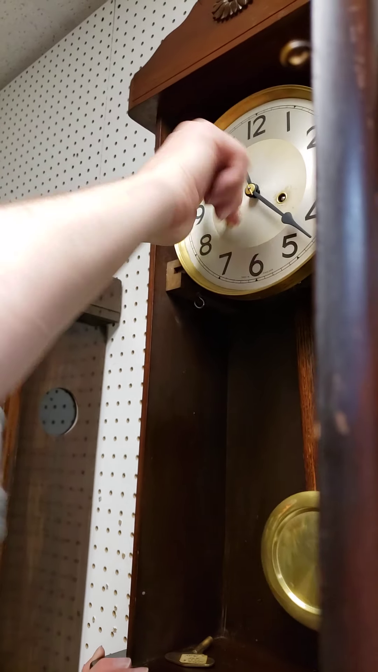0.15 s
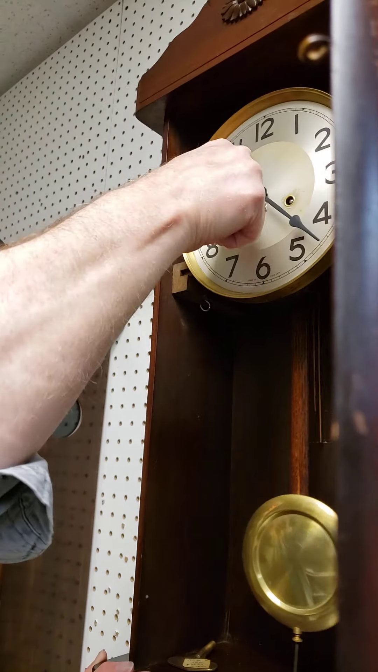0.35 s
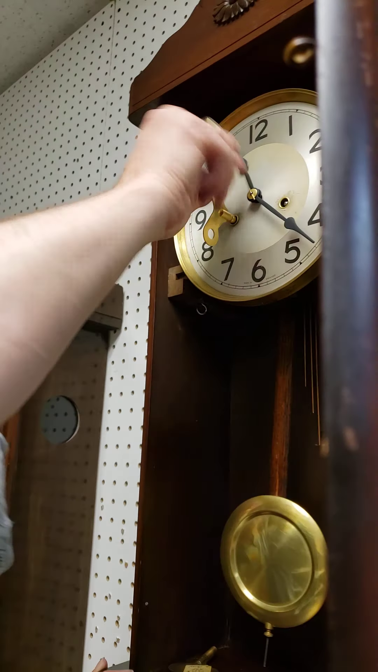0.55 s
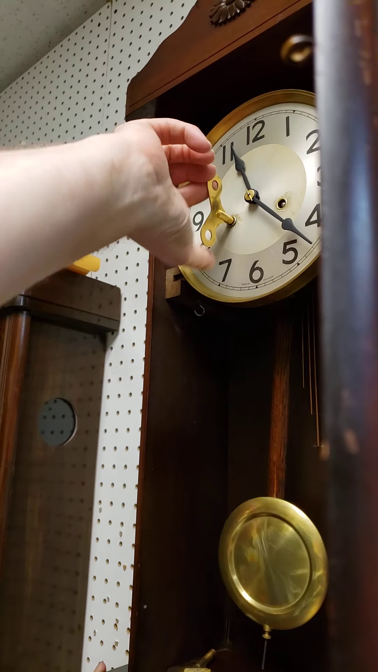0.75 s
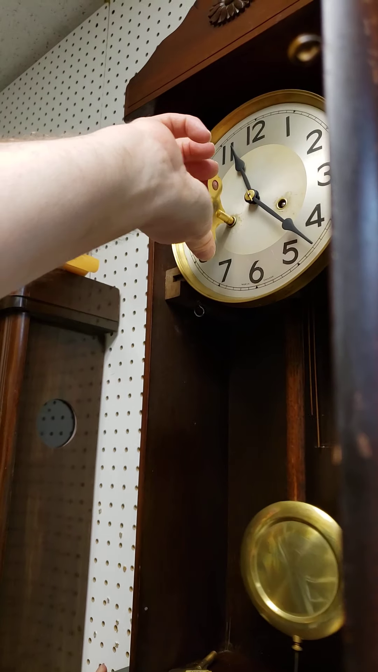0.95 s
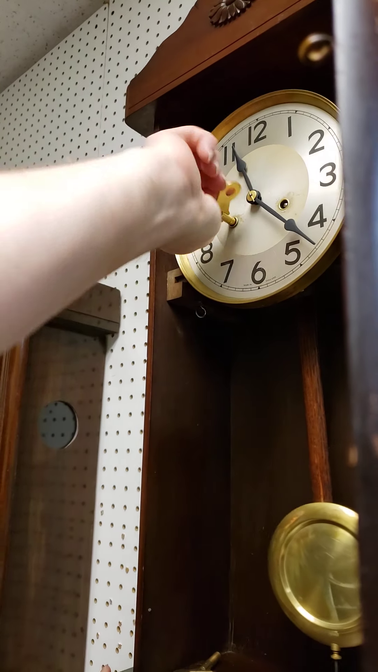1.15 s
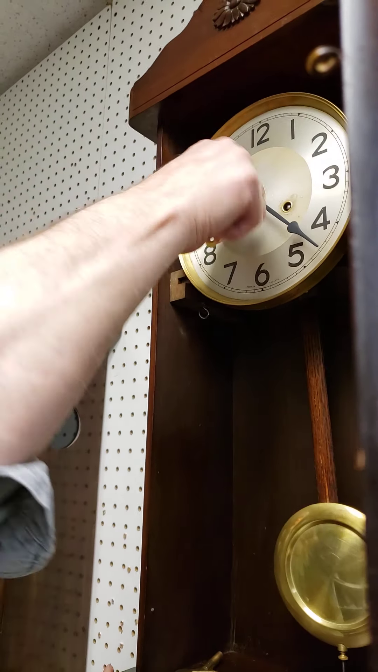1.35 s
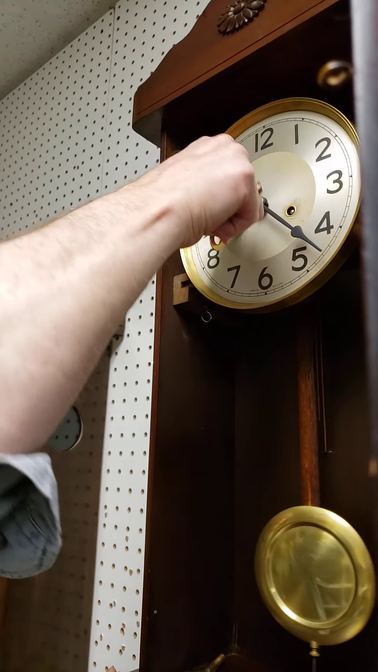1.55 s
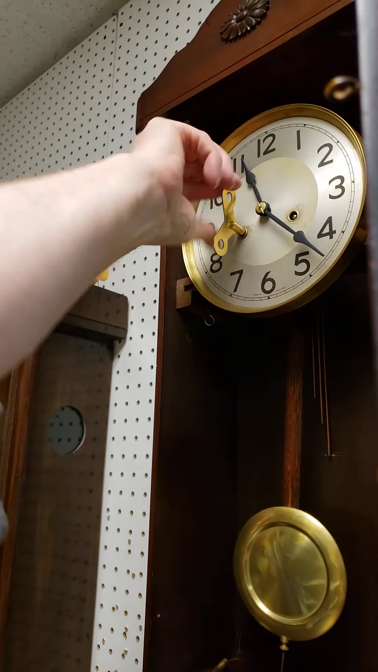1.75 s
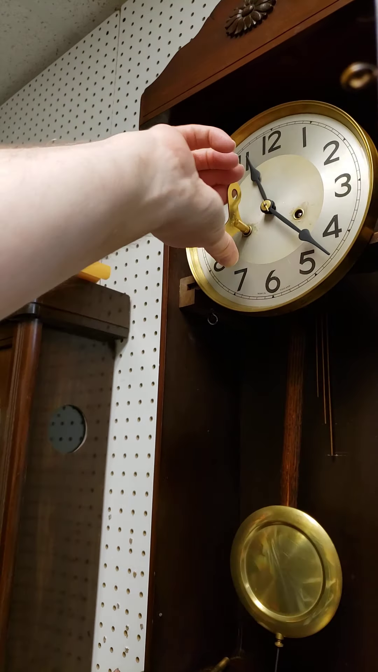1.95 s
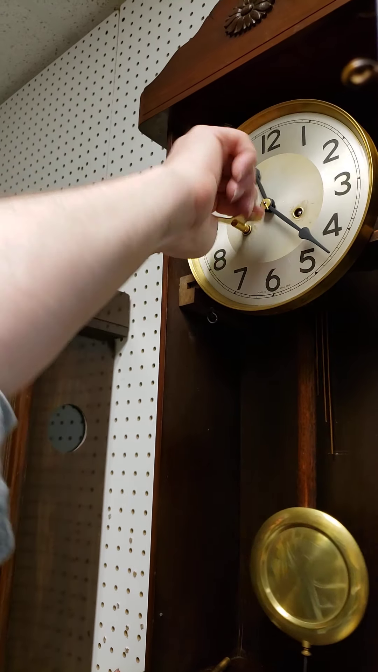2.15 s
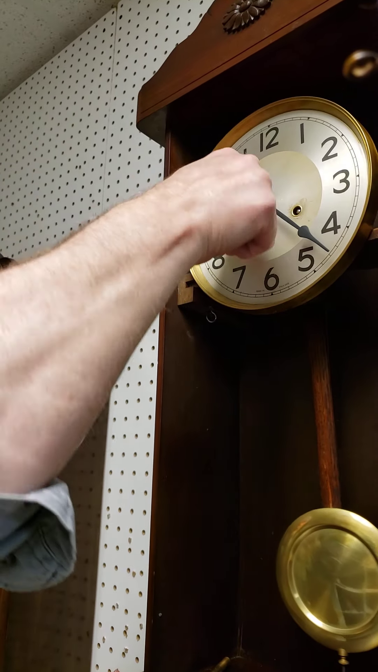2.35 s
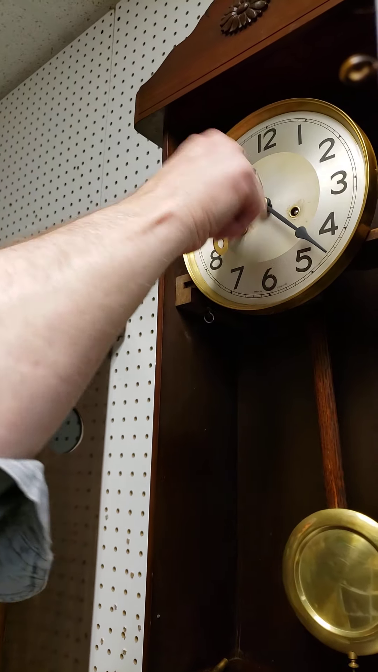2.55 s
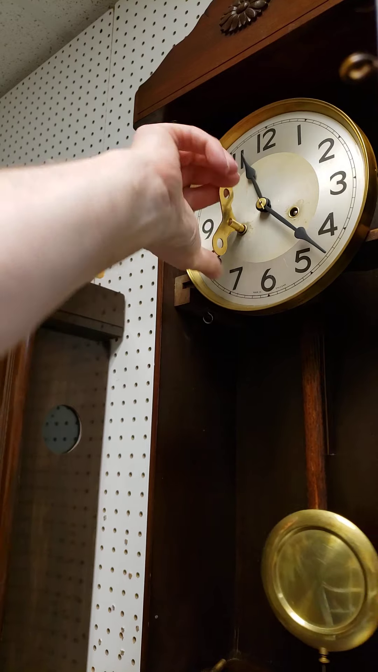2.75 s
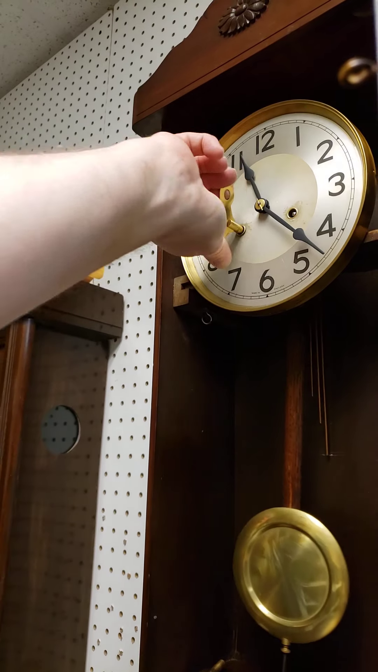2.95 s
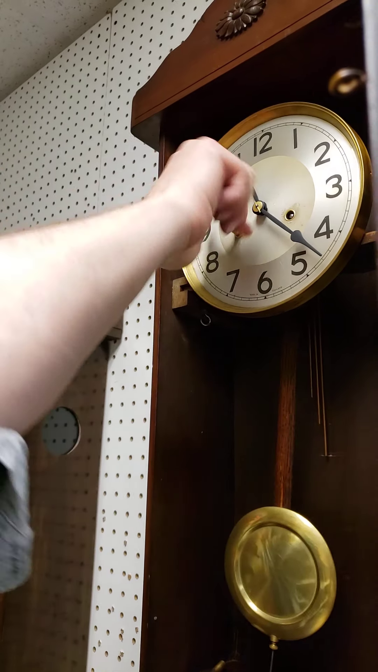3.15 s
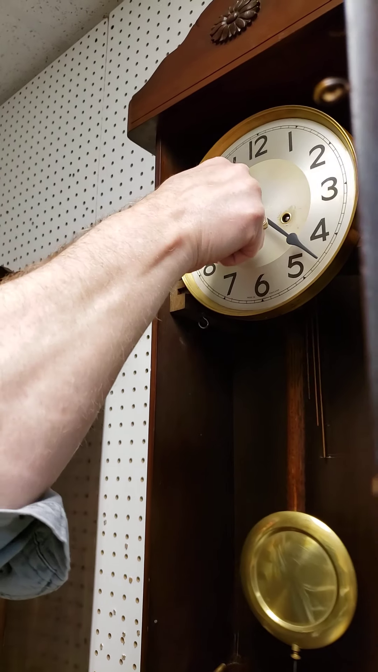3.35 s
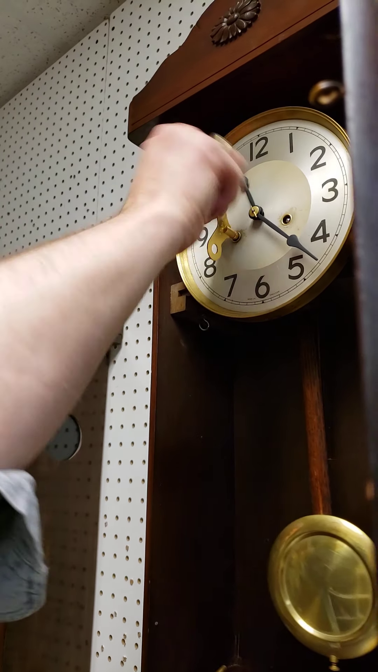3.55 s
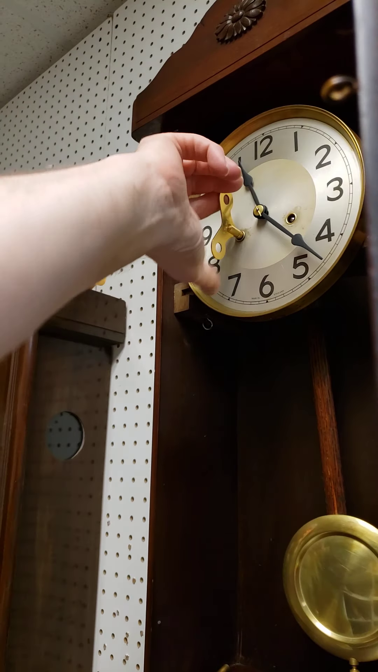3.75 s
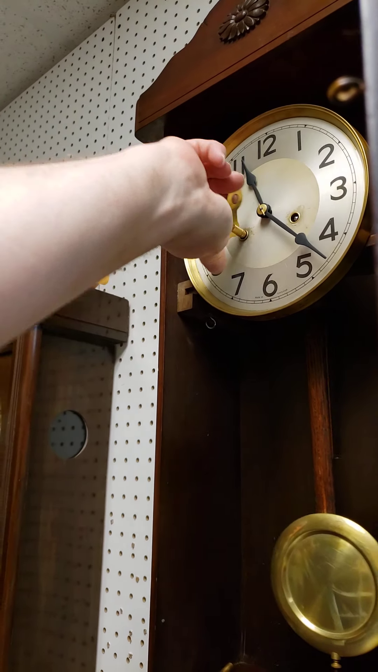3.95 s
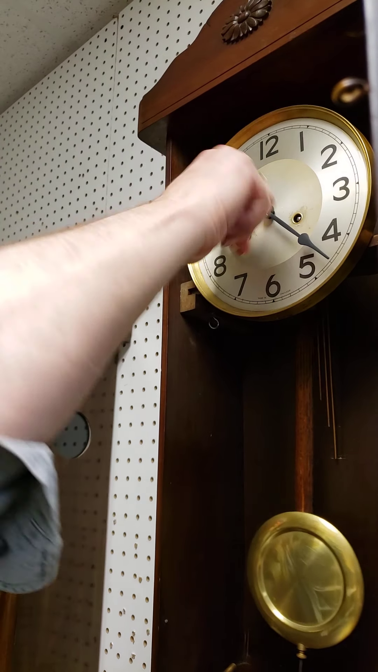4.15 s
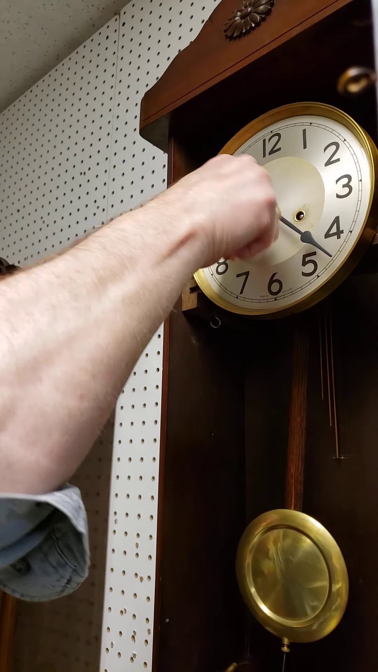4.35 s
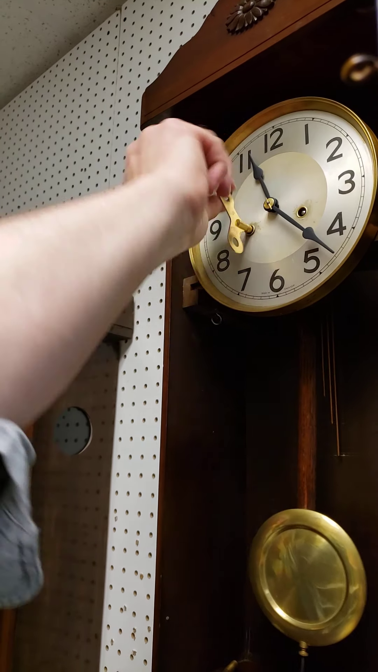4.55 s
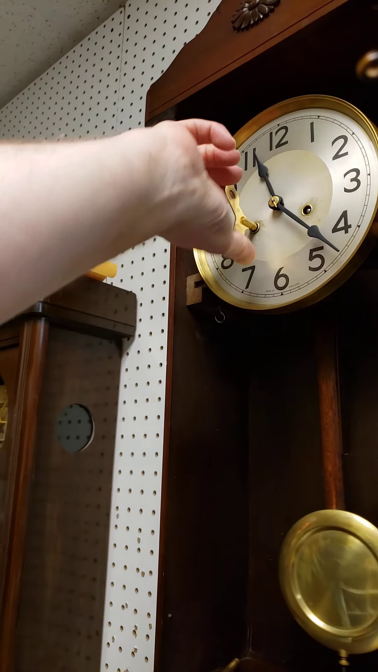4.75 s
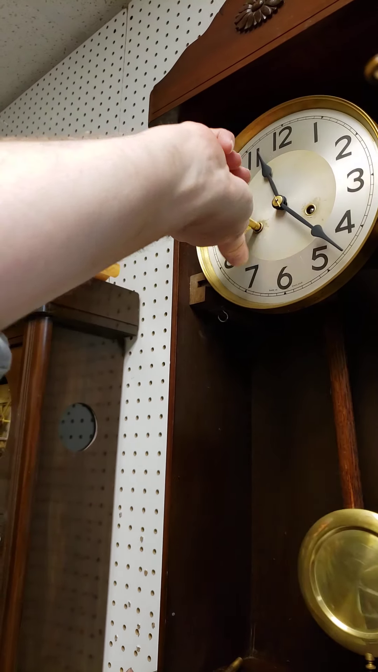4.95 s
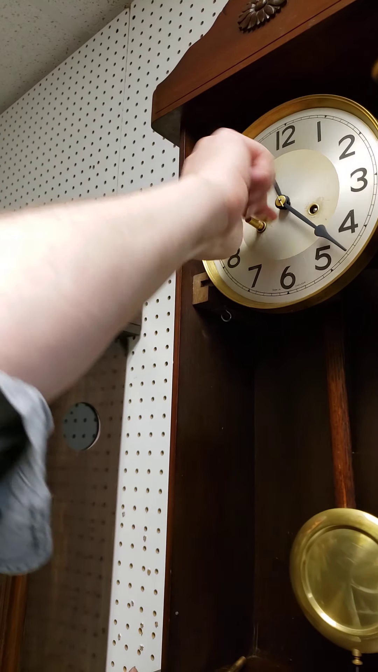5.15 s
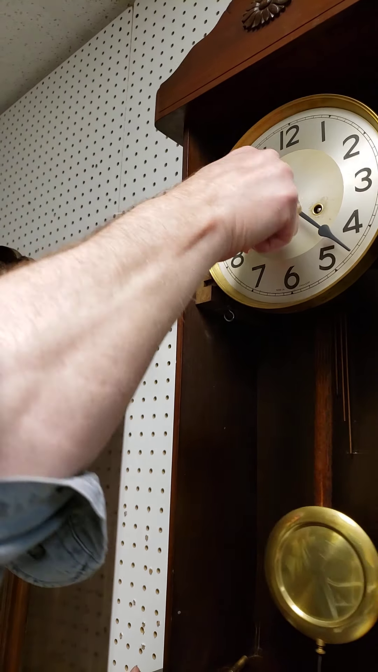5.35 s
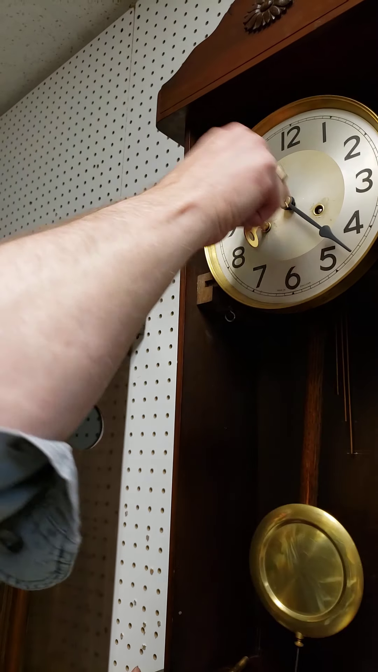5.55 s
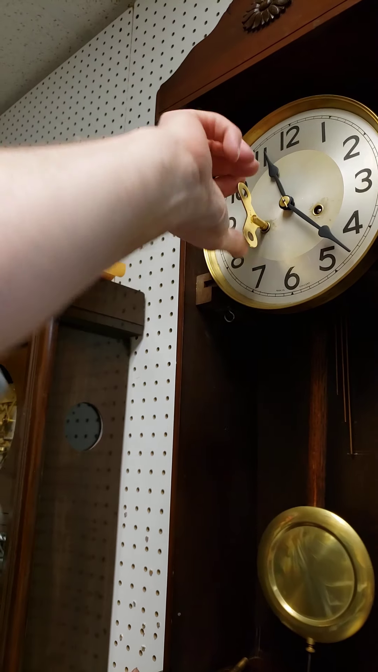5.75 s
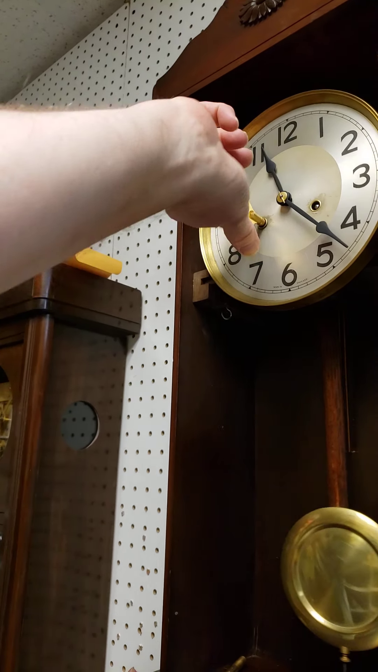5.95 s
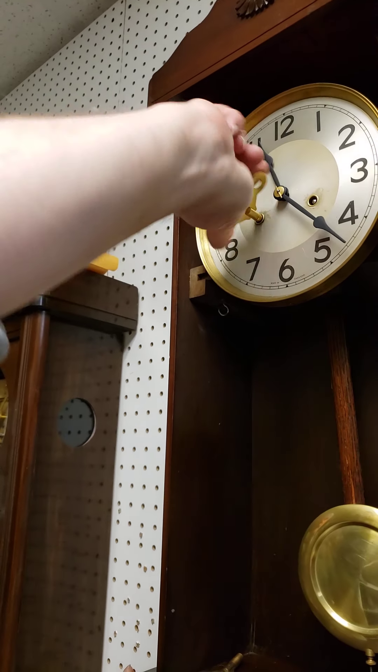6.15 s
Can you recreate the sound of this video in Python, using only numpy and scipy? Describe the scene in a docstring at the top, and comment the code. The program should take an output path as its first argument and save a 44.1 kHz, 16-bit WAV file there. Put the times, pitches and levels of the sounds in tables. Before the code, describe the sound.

After a moment of faint room air, arm rumble and a light hand knock, a clock key starts turning. The pawl snaps rapidly over metal teeth, pauses with a dull thud of the wooden case, and the hand fumbles softly for a new grip. This repeats six times at a steady pace, the last two thuds heaviest. Near, dry stereo sound with a slight ceiling echo, ending on quiet handling.

```python
"""Quiet room air and the rumble and rub of a moving arm come first, then a soft knock of a hand on a key.
Six half turns of the brass key wind a wooden wall clock: the pawl snaps over eight or nine ratchet teeth
in each, ringing damped modes and a dense noise of the brass plates. Between turns the wheel settles back
on the pawl and the hand lets go and grips again: thuds of the wooden case, brass ticks and cloth swishes.
Noise filtered by spectrum makes air, arm and rub; a ceiling echo and a short tail make the workshop."""
import sys
import numpy as np
from scipy import signal
from scipy.fft import rfft, irfft
from scipy.io import wavfile
from scipy.ndimage import uniform_filter1d

SR = 44100
rng = np.random.default_rng(int(sys.argv[2]) if len(sys.argv) > 2 else 0)


def store_pcm(level_fs):
    """Save levels as 16-bit WAV."""
    pcm = np.round(np.clip(level_fs, -1, 1) * 32767).astype(np.int16)
    wavfile.write(sys.argv[1], SR, np.atleast_2d(pcm).T)


N = 272979  # length in samples


def gain_of(db):
    """Logarithmic level: decibels to an amplitude factor."""
    return 10 ** (np.asarray(db) / 20)


def evened(x):
    """Power normalisation: scales to rms 1."""
    return x / np.sqrt(np.mean(x ** 2) + 1e-20)


def read(points, hz):
    """Interpolation in pitch: reads a table on a log-frequency axis."""
    f, value = np.transpose(points)
    return np.interp(np.log(hz + 1), np.log(f + 1), value)


def along(curve, at):
    """Linear interpolation: reads every column of a curve at the given places."""
    places, *columns = np.transpose(curve)
    return [np.interp(at, places, column) for column in columns]


def hump(hz, centre_hz, octaves):
    """Resonance-like weighting: a bell curve on a log-frequency axis, height 1."""
    return np.exp(-(np.log2((hz + 1) / centre_hz) / octaves) ** 2)


def add(mix, s, sound):
    """Superposition: mixes a sound in at time s."""
    part = mix[:, max(round(s * SR), 0):][:, :sound.shape[-1]]
    part += sound[..., :part.shape[1]]


def pan(left_db):
    """Level difference between the two microphones, left minus right, as two gains."""
    return gain_of(np.array([[left_db], [-left_db]]) / 2)


def colour(x, spectrum, size=2048):
    """Minimum-phase filtering: a causal response with the given spectrum."""
    log_gain = np.log(gain_of(read(spectrum, abs(np.fft.fftfreq(size, 1 / SR)))))
    taps = np.fft.ifft(np.exp(np.conj(signal.hilbert(log_gain)))).real
    return signal.oaconvolve(np.atleast_2d(x), taps[None], axes=1)[:, :x.shape[-1]]


# likeness of the sound at the two microphones: frequency_hz, likeness (0 to 1)
ALIKENESS = [(100, 0.94), (300, 0.93), (700, 0.46), (1500, 0.7), (3000, 0.08), (16000, 0.067)]


def noise(size):
    """Partial coherence: white stereo noise whose bass is nearly the same at both microphones."""
    a, b = rfft(rng.standard_normal((2, size)))
    alike = read(ALIKENESS, np.fft.rfftfreq(size, 1 / SR))
    return irfft(np.array([a, alike * a + np.sqrt(1 - alike ** 2) * b]), size)


def ring(rise, fall, size=2048):
    """High modal density: countless close modes swell and die after one blow; energy 1."""
    t = np.arange(size) / SR
    envelope = (1 - np.exp(-t / rise)) * np.exp(-t / fall)
    return evened(noise(size) * envelope) / np.sqrt(size)


def levelled(x, count=9):
    """Spectral smoothing: no band of a dense ring stands out; energy about 1."""
    z = rfft(x)
    z = z / np.sqrt(uniform_filter1d(abs(z) ** 2, size=count, axis=1) + 1e-12)
    return irfft(z)


def mode(hz, db, t60, t):
    """Damped oscillation: one exponentially dying sine."""
    return gain_of(db - 60 * t / t60) * np.sin(2 * np.pi * hz * t)


def chatter(depth_db, grain, size):
    """Uneven contact: a random gain of rms 1, smoothed over grain samples."""
    wander = evened(uniform_filter1d(rng.standard_normal(size), grain))
    return evened(gain_of(depth_db * wander))


def swell(t, rise, fall):
    """Transient envelope: a smooth rise and an exponential fall, height 1."""
    shape = (1 - np.exp(-t / rise)) * np.exp(-t / fall)
    return shape / shape.max()


# spectrum of the still room: frequency_hz, density_db (dB per Hz, relative)
AIR_SPECTRUM = [(25, -1), (65, 1), (200, -4), (500, -13.5), (1100, -19), (2000, -30), (7000, -42),
                (9000, -47.5), (15000, -28.5), (16500, -43.5)]
AIR_DB = -72.5


def still_air():
    """Stationary random noise: the still room as one steady coloured hiss."""
    return gain_of(AIR_DB) * evened(colour(noise(N), AIR_SPECTRUM))


# the wheel settling back on the pawl after each turn: start_s, thud_db, brass_tick_db, arm_sweep_db
# (levels relative)
SETTLINGS = [(0.482, -31, -49, -2.5), (1.594, -32.5, -53, 0), (2.535, -32.5, -44.5, 0),
             (3.48, -33, -51, 1.5), (4.455, -26.5, -41.5, 1.5), (5.541, -25, -34, 0)]
# the arm's sweep, alike in every turn: from_settle_s, rumble_db, hiss_db (before arm_sweep_db)
ARM_SWEEP = [(-0.5, -71.5, -88.5), (-0.38, -61.5, -80.5), (-0.22, -57.5, -74.5), (-0.07, -64, -76.5),
             (0.05, -61, -72.5), (0.17, -58, -72.5), (0.3, -58, -81.5), (0.42, -69.5, -82), (0.6, -75, -86)]
REST_DB_PER_S = 35  # the arm's sound dying away between sweeps


def sweeps():
    """Level contour: the arm's rumble and hiss (dB) around every settle, fading to rest outside it."""
    t = np.arange(N) / SR
    start, end = ARM_SWEEP[0][0], ARM_SWEEP[-1][0]
    levels = []
    for s, *_, arm_db in SETTLINGS:
        since = t - s
        outside = abs(since - np.clip(since, start, end))
        levels.append(np.array(along(ARM_SWEEP, since)) + arm_db - REST_DB_PER_S * outside)
    return np.max(levels, axis=0)


# spectrum of the arm's low rumble: frequency_hz, density_db (dB per Hz, relative)
RUMBLE_SPECTRUM = [(25, -11.5), (63, 7.5), (90, 3), (240, 0), (400, -2), (700, -16.5), (1200, -27),
                   (4000, -55)]
# spectrum of rubbing skin and cloth: frequency_hz, density_db (dB per Hz, relative)
RUB_SPECTRUM = [(500, -5.5), (1500, 0), (4000, -4.5), (6800, 2.5), (8800, -13), (12000, -2.5), (15000, 4),
                (16200, -19)]


def arm(grain_db=4):
    """Friction noise of the moving arm: an uneven low rumble and a fine, grainy rub of skin and cloth."""
    rumble_db, hiss_db = sweeps()
    grain = chatter(grain_db, 900, N)
    rumble = gain_of(rumble_db) * evened(grain * colour(noise(N), RUMBLE_SPECTRUM))
    hiss = gain_of(hiss_db) * evened(grain * colour(noise(N), RUB_SPECTRUM))
    return pan(1.6) * rumble + pan(4) * hiss


# the hand gripping the key or letting it go: start_s, thud_db, thud_centre_hz, brass_tick_db
# (levels relative)
HAND_TOUCHES = [(0.061, -39.5, 292, -71), (0.707, -37.5, 254, -52), (0.749, -38, 315, -54),
                (1.134, -50.5, 169, -71), (1.158, -39.5, 253, -86), (1.685, -42.5, 378, -49.5),
                (1.795, -33.5, 245, -56), (1.829, -42.5, 220, -76.5), (2.096, -41, 610, -64.5),
                (2.775, -44, 266, -76), (2.989, -56, 311, -65), (3.053, -37.5, 240, -88),
                (3.591, -50.5, 193, -56), (3.697, -46, 253, -71.5), (4.026, -40.5, 150, -67),
                (4.64, -41.5, 270, -47.5), (4.677, -30, 430, -46), (4.823, -48, 378, -56),
                (5.021, -36, 247, -63), (5.791, -43, 277, -85), (5.85, -45.5, 249, -55.5),
                (6.058, -67, 620, -57), (6.148, -39.5, 816, -71.5)]
# a settle's light first touch, blow and two rebounds: from_blow_s, thud_db, thud_centre_hz, brass_tick_db
# (levels added to those of the settle)
SETTLE_IMPACTS = [(-0.024, -12, 475, -15), (0, -3, 398, 2), (0.012, -1.5, 250, -6.5),
                  (0.042, -14, 170, -6.5)]
# stray brushes of the fingers after each settle; levels relative, before the fade
BRUSH_FROM_S, BRUSH_TO_S, BRUSH_FADE_DB_PER_S = 0.044, 0.29, 21.5
BRUSH_DB, BRUSH_HZ, BRUSH_TICK_DB = -48.5, 282, -66


def bumps(count=3):
    """Impact sequence (s, thud dB, centre Hz, tick dB): touches, settles with rebounds, finger brushes."""
    yield from HAND_TOUCHES
    for s, thud_db, tick_db, _ in SETTLINGS:
        for delay, extra_db, centre_hz, extra_tick_db in SETTLE_IMPACTS:
            yield s + delay, thud_db + extra_db, centre_hz, tick_db + extra_tick_db
        shares = (np.arange(count) + rng.random(count)) / count
        for delay in BRUSH_FROM_S + (BRUSH_TO_S - BRUSH_FROM_S) * shares:
            fade_db = BRUSH_FADE_DB_PER_S * delay
            yield s + delay, BRUSH_DB - fade_db, BRUSH_HZ, BRUSH_TICK_DB - fade_db


# modes of the wooden case: pitch_hz, level_db (relative), t60_s
WOOD_MODES = [(64.5, -8.5, 0.34), (118, -8, 0.14), (170, -10, .12), (197, -6, 0.2), (248, -3, .1),
              (290, -9, .08), (367, -12, 0.1), (510, -5.5, 0.044), (582.4, -1, 0.11), (660, -5.5, .07),
              (760, -5, 0.06), (1160, -16, 0.1)]
# dense ring of the wood: frequency_hz, density_db (dB per Hz, relative)
WOOD_SPECTRUM = [(40, -27), (120, -3), (250, -3.5), (650, -5.5), (900, -10.5), (1300, -23.5), (3000, -25),
                 (9000, -59)]
# dense ring of the key in its hole: frequency_hz, density_db (dB per Hz, relative)
KEY_SPECTRUM = [(300, -15.5), (1000, -5), (2800, 0.5), (4000, -3.5), (6500, -3), (9000, -10), (12000, -8.5),
                (15000, 0.5), (16500, -18.5)]
CASE_SIDE_DB = 1.8  # left minus right


def knocks(modes_db=-21, wood_db=31, tick_db=25, spread_db=5.5, focus_db=10, octaves=0.63, size=4096):
    """Modal excitation: each bump favours case modes near its centre pitch; the key rattles in its hole."""
    tones, wood, ticks = np.zeros((3, 2, N))
    t, hz = np.arange(SR // 2) / SR, np.fft.rfftfreq(size, 1 / SR)
    for s, thud_db, centre_hz, brass_db in bumps():
        sizes_db = thud_db + modes_db + spread_db * rng.standard_normal(len(WOOD_MODES))
        for (f, db, t60), size_db in zip(WOOD_MODES, sizes_db):
            ringing = mode(f, db + size_db + focus_db * hump(f, centre_hz, octaves), t60, t)
            add(tones, s + 0.0014, rng.choice([-1, 1]) * ringing)
        blow = rfft(levelled(ring(rise=0.0028, fall=0.019, size=size), count=21))
        focus = gain_of(focus_db * hump(hz, centre_hz, octaves))
        add(wood, s, gain_of(thud_db + wood_db) * irfft(blow * focus))
        rattle = chatter(depth_db=11, grain=270, size=size)
        add(ticks, s, gain_of(brass_db + tick_db) * rattle * ring(rise=.002, fall=.008, size=size))
    return pan(CASE_SIDE_DB) * (tones + colour(wood, WOOD_SPECTRUM)) + pan(1) * colour(ticks, KEY_SPECTRUM)


def fingers(rub_db=-71, follow=0.16, rise_s=0.0033, fall_s=0.026, grain_db=4):
    """Sliding friction: at each touch skin rubs briefly on the key, louder when the key ticks harder."""
    level, t = np.zeros((1, N)), np.arange(SR // 4) / SR
    usual_db = np.mean([tick_db for *_, tick_db in HAND_TOUCHES])
    for s, _, _, tick_db in HAND_TOUCHES:
        add(level, s, gain_of(rub_db + follow * (tick_db - usual_db)) * swell(t, rise_s, fall_s))
    return pan(3) * level * evened(chatter(grain_db, 130, N) * colour(noise(N), RUB_SPECTRUM))


# decay time of the room: frequency_hz, t60_s
ROOM_DECAY = [(100, 0.78), (500, 0.25), (2000, 0.26), (6000, 0.22), (15000, 0.19)]
# spectrum of the room's tail: frequency_hz, level_db (relative)
ROOM_SPECTRUM = [(100, -4), (600, 0), (1400, 0.5), (2000, -2), (2900, -0.5), (4000, 0), (7000, -2.5),
                 (15000, -2)]


def room_response(wet_db=-4, wall_db=-12, wall_s=0.012, build_s=0.0046):
    """Frequency-dependent reverberation: a scattered near-wall reflection and a tail dying by band."""
    hz, t, z = signal.stft(noise(SR // 2), SR, nperseg=256)
    decay = gain_of(-60 * t / read(ROOM_DECAY, hz)[:, None])
    tail = signal.istft(z * decay, SR, nperseg=256)[1]
    tail *= 1 - np.exp(-(np.arange(tail.shape[1]) / SR / build_s) ** 2)
    tail = gain_of(wet_db) * colour(tail / np.linalg.norm(tail[0]), ROOM_SPECTRUM)
    add(tail, wall_s, gain_of(wall_db) * ring(rise=0.012, fall=0.0014))
    return tail


# ceiling reflection: frequency_hz, level_db (relative to the direct sound)
CEILING_ECHO = [(100, -11), (400, -10.5), (800, -12), (1600, -11.5), (3000, -21.5), (8000, -29)]


def workshop(x, count=3):
    """Reflection and reverberation: a ceiling echo, and random room tails that trade places for smoothness."""
    out, t = np.zeros((2, N)), np.arange(N) / SR
    add(out, .00852, colour(x, CEILING_ECHO))
    for k in range(count):
        # the shares trade places at a steady rate, with constant total power
        share = np.sqrt(2 / count) * np.cos(np.pi * (3.7 * t + k / count))
        out += signal.fftconvolve(x * share, room_response(), axes=1)[:, :N]
    return out


# half turns of the key: first_tooth_s, last_tooth_s, teeth (count), early_gap_ms, midway_gap_ms,
# late_gap_ms, early_level_db, late_level_db, extra_low_ring_db, then the plates' 2-3 kHz clack:
# early_clack_db, midway_clack_db, late_clack_db (levels relative)
HALF_TURNS = [(0.1068, 0.3415, 9, 28.4, 24.2, 29.9, -34, -33.5, 1, -0.5, 0.5, 3),
              (1.2093, 1.4583, 9, 30.6, 27.1, 29.3, -33.8, -31.7, -0.5, -2.5, -0.5, -0.5),
              (2.1459, 2.4131, 9, 28.9, 29.8, 32.4, -32.3, -31.6, -0.5, 2, 2, 1.5),
              (3.1005, 3.39, 9, 30.3, 30.2, 31.7, -32.2, -31.5, 1.5, -3, -2.5, -2.5),
              (4.0711, 4.2816, 8, 27.5, 27.4, 31.4, -31.5, -31.2, 1.5, -4.5, -3, 1),
              (5.0775, 5.36, 9, 36.3, 31.3, 35.9, -31.3, -31.6, 0.5, 1, -3.5, -0.5)]
# the wrist's push through every turn: share_of_teeth_passed (0 to 1), level_db, extra_treble_db,
# extra_low_ring_db (levels added to those of the turn)
WRIST_PUSH = [(-0.14, -0.022, -1.4, 0.13), (1 / 8, 0.9, 0, -1.2), (2 / 8, 0, -1.8, 0), (4 / 8, 0, 0, 0.5),
              (5 / 8, 0.26, -0.5, 2), (6 / 8, 0, -1, 0.9), (7 / 8, 0.35, 0.3, -0.59),
              (1, 0.13, -0.57, -3.5)]
TOOTH_SPREAD_DB = 0.7


def teeth(count=2):
    """Stepped rotation: each tooth's (s, dB, clack dB, treble dB, low ring dB), with a slow last tooth."""
    stages = [0, .5, 1]  # early, midway, late
    for first_s, last_s, number, early_ms, mid_ms, late_ms, early_db, late_db, ring_db, *clacks_db in HALF_TURNS:
        # the first and the last tooth have times of their own
        gaps = np.interp(np.linspace(0, 1, number - count), stages, [early_ms, mid_ms, late_ms]) / 1000
        times = [first_s, *(first_s + np.cumsum(gaps)), last_s]
        for s, share in zip(times, np.linspace(0, 1, len(times))):
            push_db, treble_db, low_db = along(WRIST_PUSH, share)
            turn_db = early_db + (late_db - early_db) * share
            db = turn_db + push_db + TOOTH_SPREAD_DB * rng.standard_normal()
            yield s, db, np.interp(share, stages, clacks_db), treble_db, ring_db + low_db


def contact_colour(hz, depth_db, count=12):
    """Contact variation: each tooth is struck a little differently, by a smooth random gain over frequency."""
    knots_hz = np.geomspace(400, 16000, count)
    return gain_of(read(np.transpose([knots_hz, depth_db * rng.standard_normal(count)]), hz))


# ring of the brass plates and wheels at the left microphone: frequency_hz, density_db (dB per Hz, relative)
PLATES_LEFT = [(120, -39), (420, -18), (600, 4.5), (850, -3), (1120, -10.5), (1500, -2), (2450, -5.5),
               (3000, -0.5), (3800, -4.5), (4800, 0), (7600, 0), (8500, -4), (10500, -1.5), (12500, 6),
               (15400, 13), (16000, -11.5)]
# the same ring at the right microphone: frequency_hz, density_db (dB per Hz, relative)
PLATES_RIGHT = [(120, -27.5), (420, -30.5), (620, -9.5), (1080, -13), (1750, -5), (2200, 0), (2500, -22),
                (2800, -3.5), (3500, -8.5), (4300, -8.5), (6300, -11.5), (7000, -18.5), (9500, -19.5),
                (12000, -8.5), (15400, -4.5), (16000, -29)]
# modes of the movement that the pawl rings: pitch_hz, level_db (relative), t60_s, left_minus_right_db
MOVEMENT_MODES = [(249, -19, 0.082, 0.5), (452.3, -9, 0.014, 4.5), (601, -2.5, 0.029, 3),
                  (681, -12, 0.031, 1.5), (809, -13, 0.054, -0.5), (1481, -19.5, 0.035, 9.5),
                  (1761, -12.5, 0.025, 6.5), (2097, -5.5, 0.034, 0), (2808, -8.5, 0.04, -0.5),
                  (3020, -10.5, 0.027, 3), (4655, -5.5, .016, 11.5), (5540, -10.5, 0.013, 8.5),
                  (6570, -12, .016, 6.5), (7520, -9.5, 0.031, 15.5)]
MODE_SPREAD_DB, MODE_DETUNE, LOW_RING_HZ = 2.5, 0.012, 600  # detune as a share of the pitch


def ratchet(plates_db=35.0, modes_db=4, scrape_db=6, same_hz=4500, chatter_db=2, lag_s=0.00034, size=2048):
    """Impact excitation: the pawl scrapes over a tooth and drops, ringing brass plates and discrete modes."""
    plates, tones = np.zeros((2, 2, N))
    hz, t = np.fft.rfftfreq(size, 1 / SR), np.arange(2 * size) / SR
    # part of the ring is the same for every tooth; the fresh share is new, a little more so in the treble
    fresh = 0.73 + 0.086 * hz ** 2 / (hz ** 2 + same_hz ** 2)
    shared = rfft(levelled(ring(rise=0.009, fall=0.002)))
    # the plates' clack and the bright snap of the pawl vary separately
    clack, treble = hump(hz, 2200, 1.3), hump(hz, 14000, .6)
    for s, db, clack_db, treble_db, low_db in teeth():
        own = rfft(levelled(ring(rise=0.012, fall=0.0023) * chatter(chatter_db, 32, size), count=61))
        snap = np.sqrt(1 - fresh ** 2) * shared + fresh * own
        snap = snap * gain_of(clack_db * clack + treble_db * treble) * contact_colour(hz, depth_db=2.0)
        add(plates, s - .0003, gain_of(db + plates_db) * irfft(snap))
        add(plates, s - .003, gain_of(db + scrape_db) * ring(rise=.002, fall=.002))
        sizes_db = db + clack_db + modes_db + MODE_SPREAD_DB * rng.standard_normal(len(MOVEMENT_MODES))
        tuning = 1 + MODE_DETUNE * rng.standard_normal()  # each tooth rings at a slightly different random pitch
        for k, ((f, mode_db, t60, side), size_db) in enumerate(zip(MOVEMENT_MODES, sizes_db)):
            ringing = mode(f * tuning, mode_db + size_db + low_db * hump(f, LOW_RING_HZ, 1), t60, t)
            add(tones, s + .0008, (-1) ** k * pan(side) * ringing)  # neighbours start in opposite directions
    brass = np.vstack([colour(plates[0], PLATES_LEFT), colour(plates[1], PLATES_RIGHT)])
    left, right = brass + tones
    # the dial faces the left microphone, so the right one hears it later
    return np.array([left, np.pad(right, (round(lag_s * SR), 0))[:N]])


# the whole case rocking against the wall: frequency_hz, density_db (dB per Hz, relative)
HEAVE_SPECTRUM = [(25, -25), (55, -1.5), (110, -4), (180, -9), (400, -39), (2000, -72)]


def heave(heave_db=-22, rise_s=0.026, fall_s=0.056):
    """Load transfer: as the spring's pull passes from hand to pawl, the case rocks with the blow's strength."""
    level, t = np.zeros((1, N)), np.arange(SR // 2) / SR
    for s, thud_db, _, _ in SETTLINGS:
        add(level, s - 0.005, gain_of(thud_db + heave_db) * swell(t, rise_s, fall_s))
    return pan(CASE_SIDE_DB) * level * evened(colour(noise(N), HEAVE_SPECTRUM))


# the sleeve's swish as the hand swings back: middle_s, length_s, level_db (before fades and panning)
SLEEVE_SWINGS = [(0.662, 0.09, -75), (1.767, 0.18, -73.5), (2.745, 0.075, -76), (3.772, 0.12, -72.5),
                 (4.835, 0.085, -70.5), (5.773, 0.18, -81)]
SWISH_HZ, SWISH_WANDER_HZ = 2560, 318


def sleeve(width_hz=400, uneven_db=4, count=4):
    """Cloth friction: short swells of noise, shifted by a carrier to one soft band of wandering pitch."""
    out = np.zeros((2, N))
    band = signal.butter(2, width_hz / 2, fs=SR, output="sos")
    for s, length, db in SLEEVE_SWINGS:
        size = int(length * SR)
        knots = rng.uniform(-0.77, 1, count)
        wander = np.interp(np.linspace(0, 1, size), np.linspace(0, 1, count), knots)
        glide = np.cos(2 * np.pi * np.cumsum(SWISH_HZ + SWISH_WANDER_HZ * wander) / SR)
        friction = signal.sosfilt(band, rng.standard_normal((2, SR // 4))) * chatter(uneven_db, 900, SR // 4)
        swish = signal.windows.tukey(size, .6) * evened(friction[:, :size] * glide)
        add(out, s - length / 2, gain_of(db) * swish)
    return pan(8.5) * out


def scene():
    """Superposition of sources: the clock and the winding arm in a quiet room."""
    clock = ratchet() + knocks() + fingers() + sleeve()
    return clock + workshop(clock) + heave() + arm() + still_air()


EDGE_HZ = 16450


def record(dry, bass_hz=30):
    """Band limiting: a bass roll-off and a steep upper edge."""
    dry = signal.sosfilt(signal.butter(2, bass_hz, "high", fs=SR, output="sos"), dry)
    taps = signal.firwin(301, EDGE_HZ, window=("kaiser", 7), fs=SR)
    return signal.oaconvolve(dry, taps[None], "same")


dry = scene()
out = record(dry)
store_pcm(out)
```